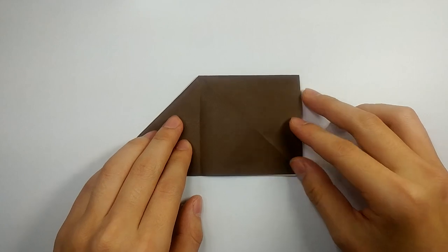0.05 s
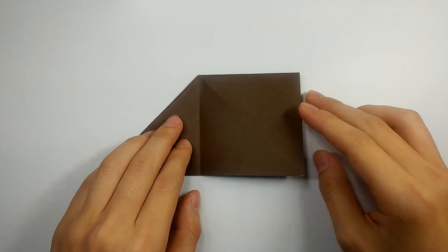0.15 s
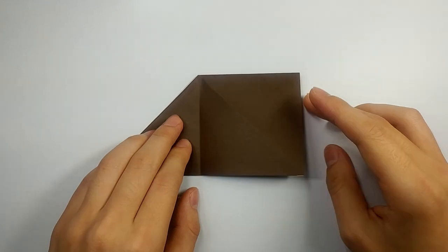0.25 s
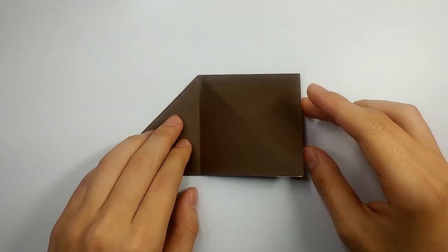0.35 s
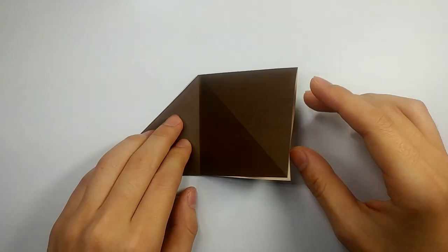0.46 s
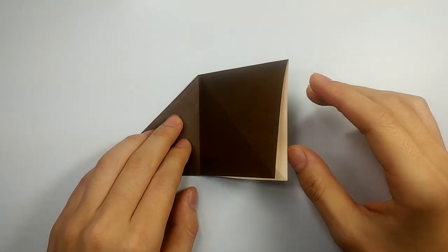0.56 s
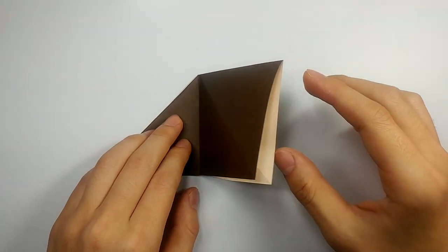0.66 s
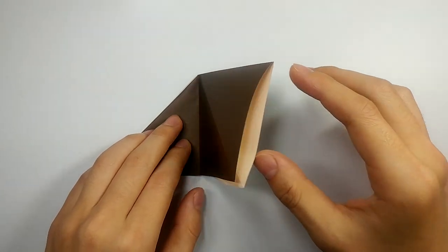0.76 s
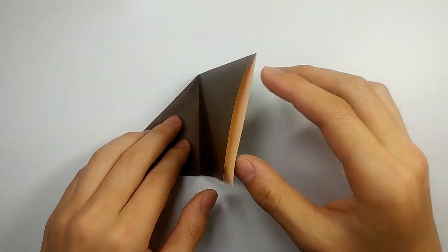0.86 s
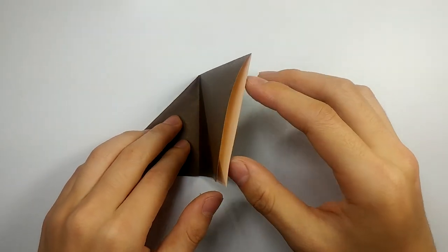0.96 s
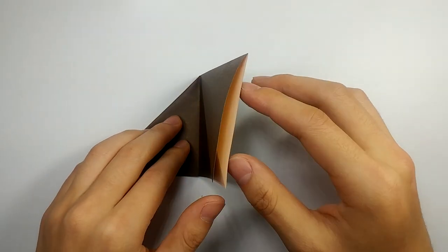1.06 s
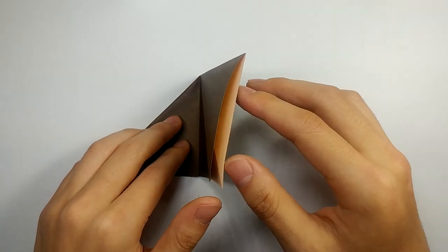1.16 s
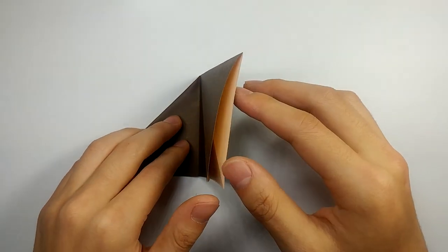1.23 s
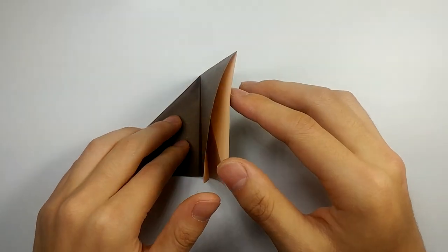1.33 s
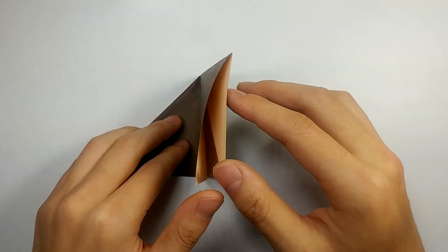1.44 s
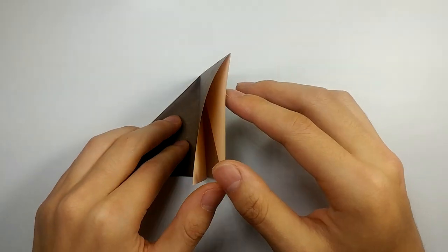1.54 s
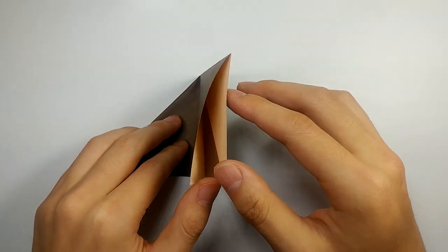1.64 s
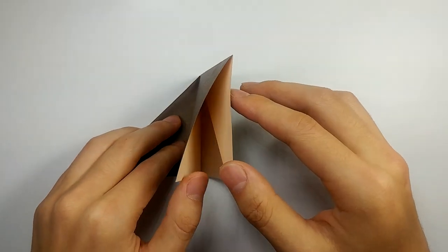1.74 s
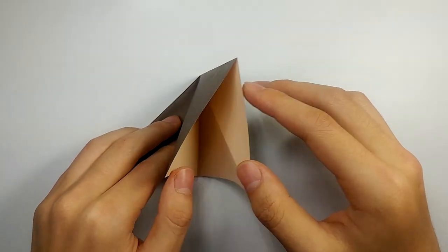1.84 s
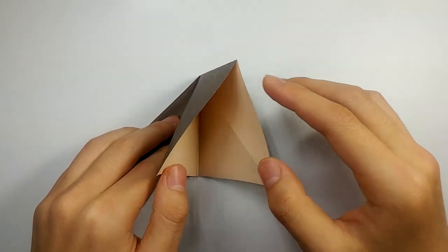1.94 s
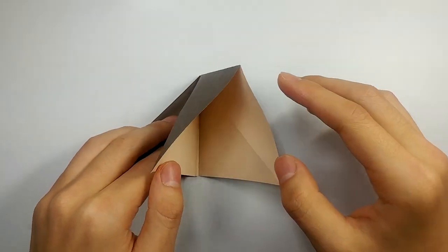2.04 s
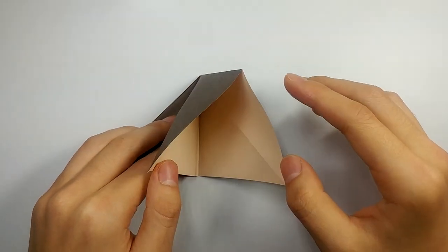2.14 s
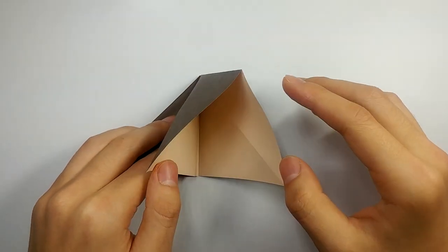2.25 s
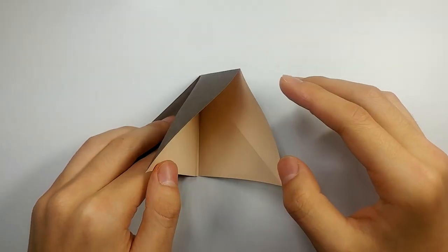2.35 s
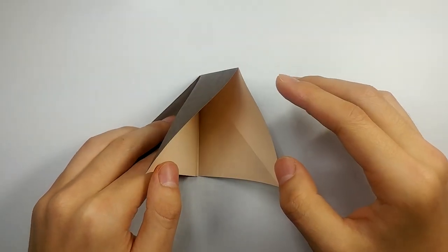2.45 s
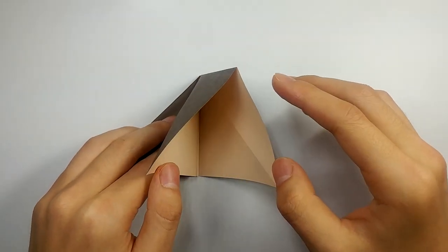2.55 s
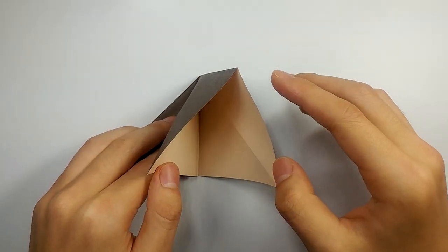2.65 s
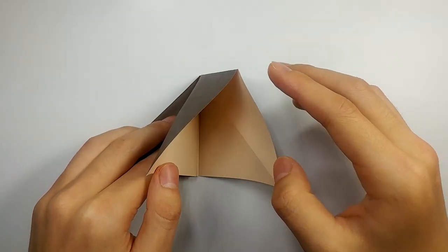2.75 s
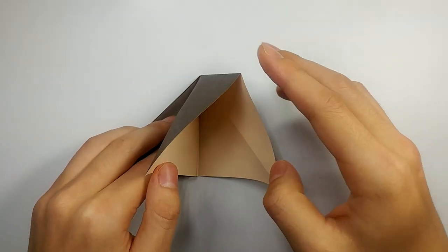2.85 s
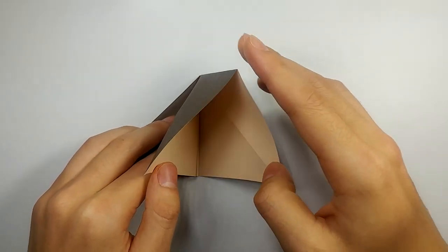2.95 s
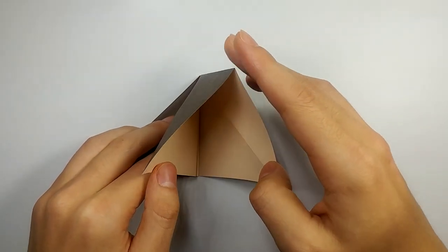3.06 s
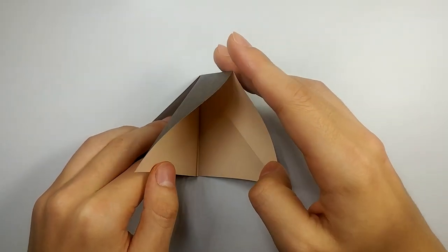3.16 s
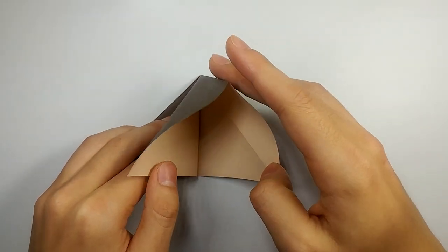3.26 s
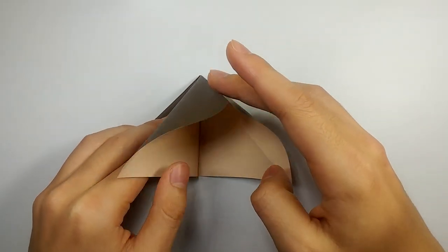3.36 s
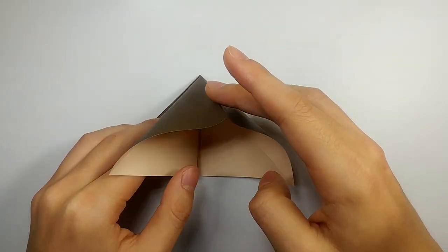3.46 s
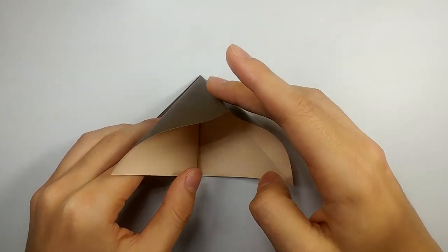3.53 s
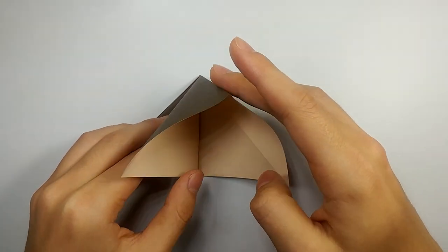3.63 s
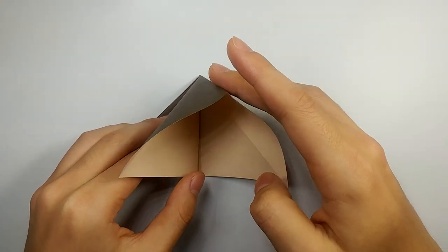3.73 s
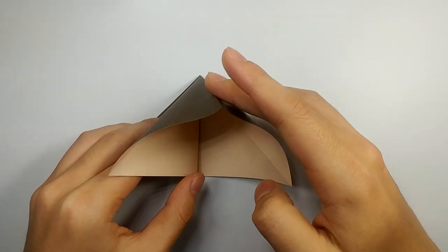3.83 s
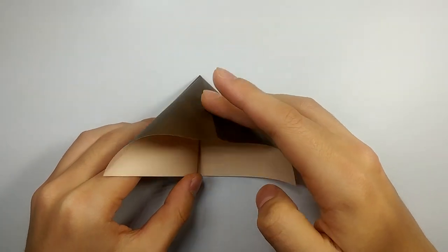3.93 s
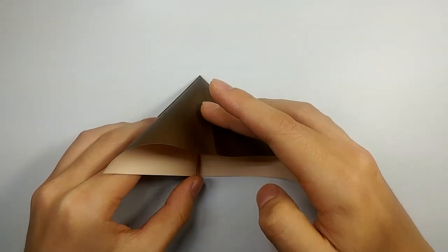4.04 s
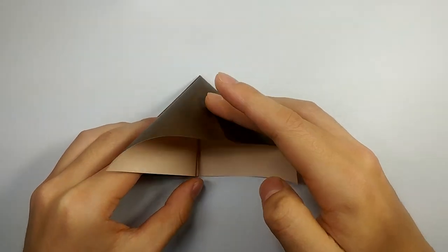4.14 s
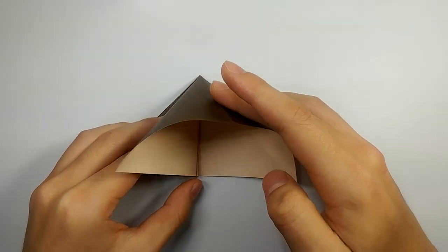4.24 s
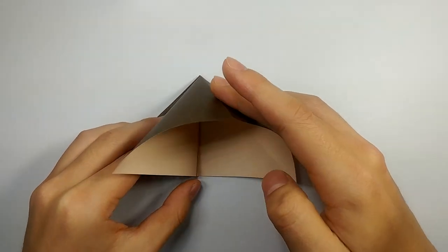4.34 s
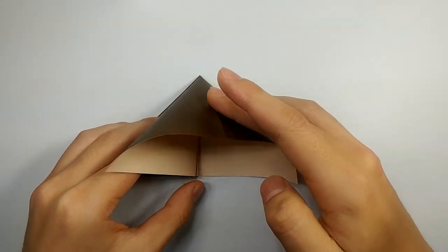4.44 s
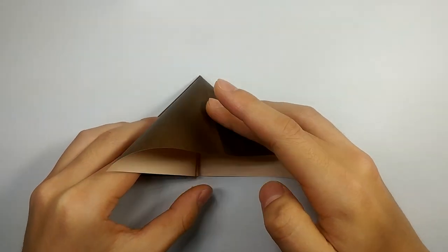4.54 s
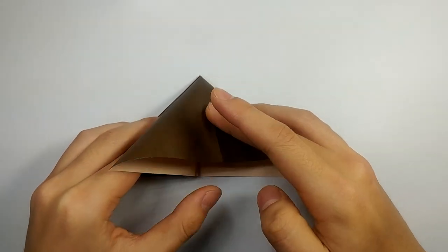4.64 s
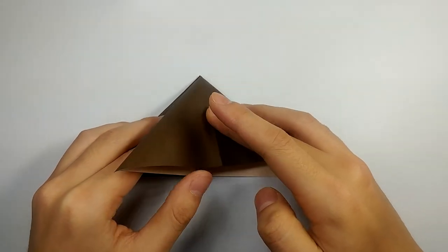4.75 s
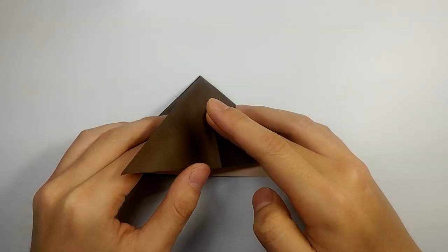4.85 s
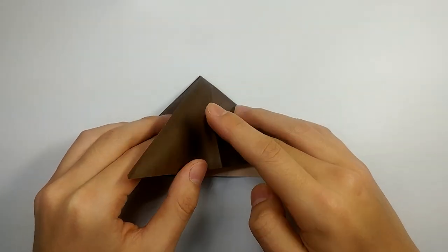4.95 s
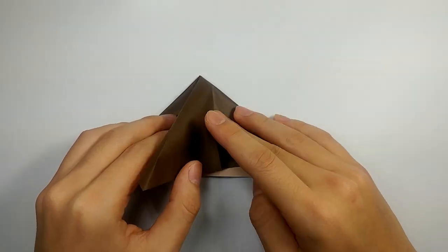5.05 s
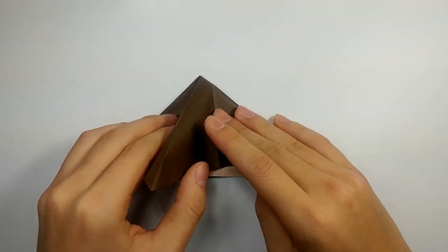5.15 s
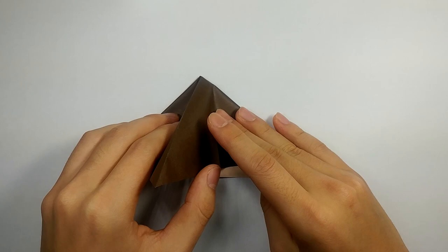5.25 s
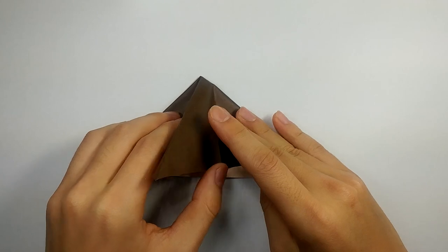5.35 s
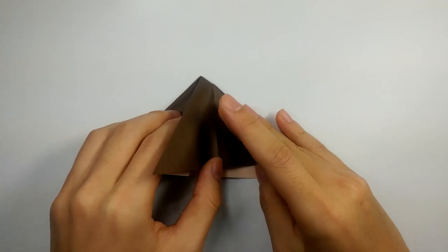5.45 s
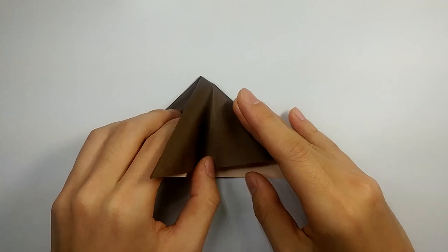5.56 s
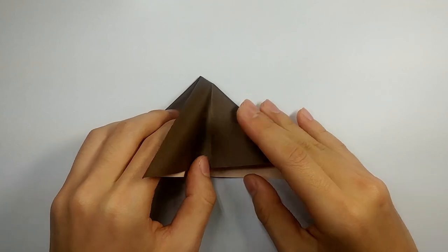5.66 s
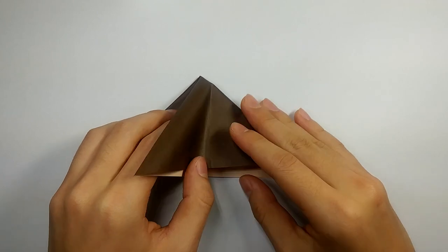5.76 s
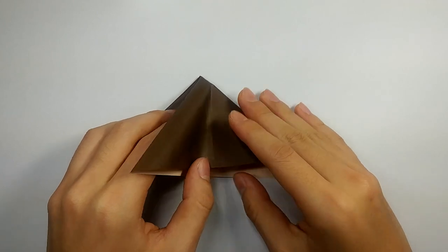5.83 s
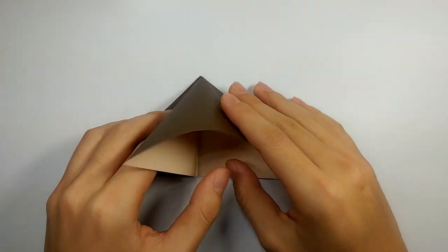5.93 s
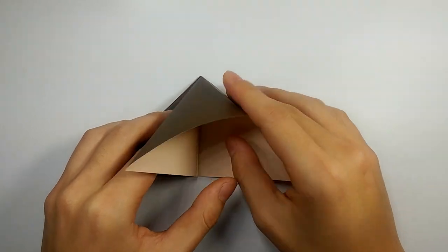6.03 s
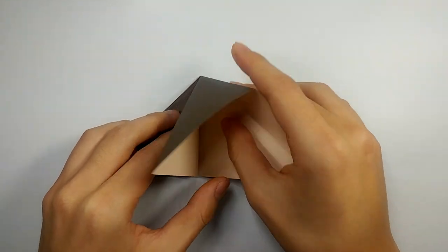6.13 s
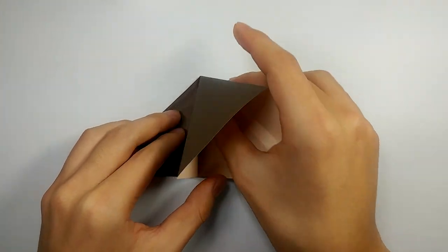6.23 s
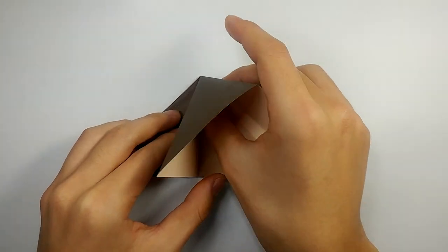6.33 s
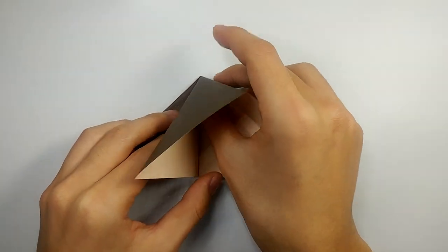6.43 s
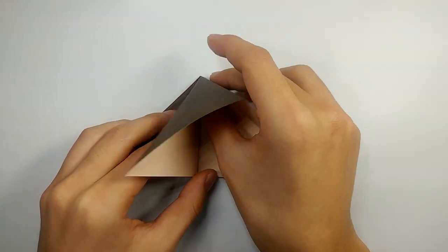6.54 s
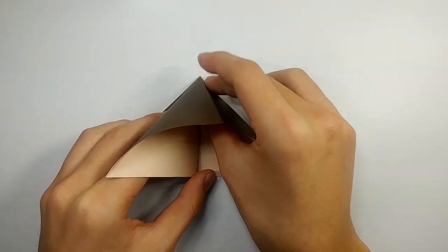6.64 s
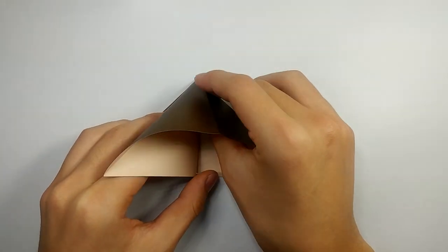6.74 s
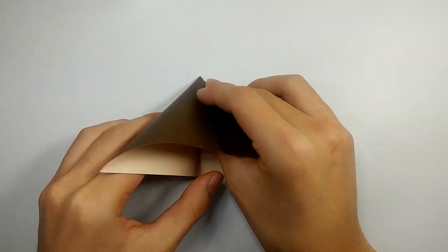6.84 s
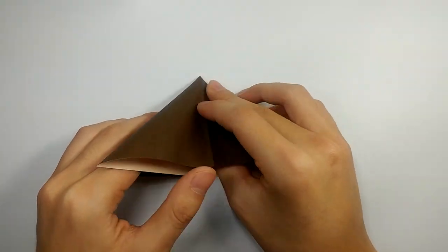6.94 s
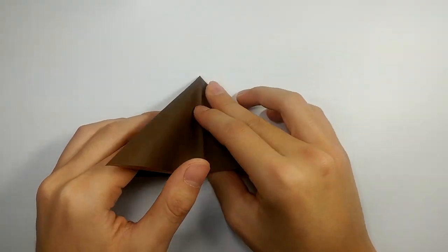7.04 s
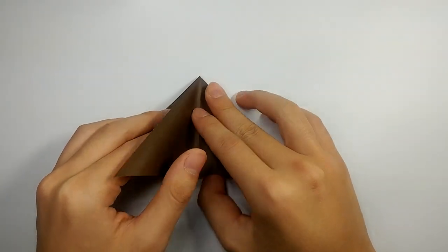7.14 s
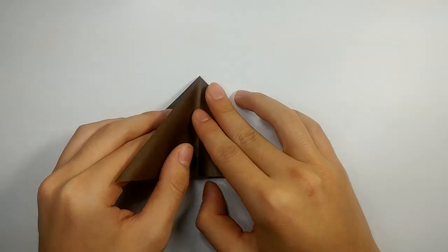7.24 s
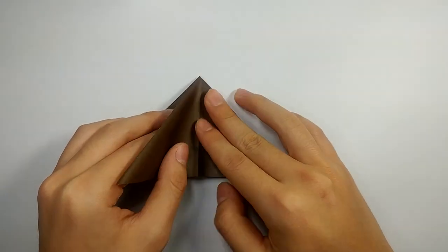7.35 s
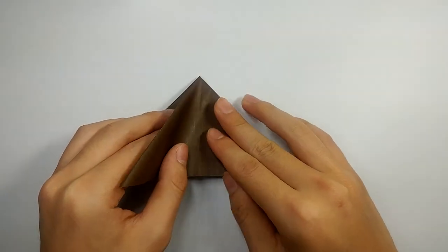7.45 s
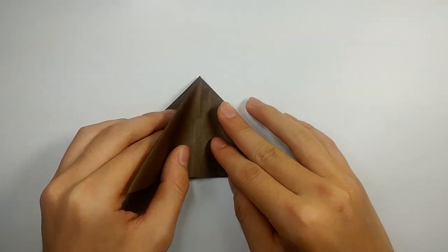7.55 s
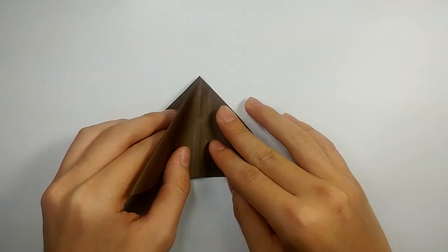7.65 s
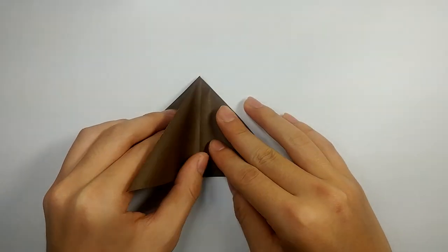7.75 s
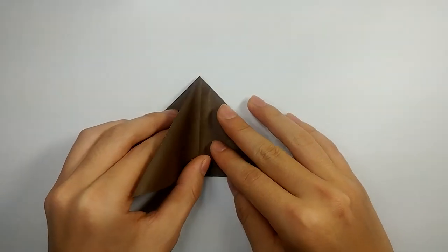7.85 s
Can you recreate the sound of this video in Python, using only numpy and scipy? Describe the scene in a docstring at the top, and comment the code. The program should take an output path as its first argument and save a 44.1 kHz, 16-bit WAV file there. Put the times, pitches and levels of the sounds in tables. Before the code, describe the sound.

Close, mono sound of fingers working a crisp paper sheet on a tabletop: brief dry slides, tacky fingertip ticks, clicking creases and mostly quiet gaps at first. Later come sharp, louder snaps, quick swelling scrapes as a flap slips free, soft low taps, and finally steady papery smoothing. A small room answers briefly over low background noise.

```python
"""Stiff origami paper snaps, swishes and rustles as hands open it and squash it flat on a table.
Each snap is three bursts of noise that ring out: the flap, the crease and the cracking fibres.
Sliding fingers, scraping edges and peeling skin are noise made of many tiny slips; soft thumps are low bursts.
A small room answers, over faint rumble and hiss, and a close camera microphone colours it all."""
import sys
import numpy as np
from scipy import signal
from scipy.fft import rfft, irfft, next_fast_len
from scipy.io import wavfile
from scipy.ndimage import uniform_filter1d, map_coordinates

SR = 44100
rng = np.random.default_rng(int(sys.argv[2]) if len(sys.argv) > 2 else 0)


def pcm_store(signal):
    """Save signal as 16-bit PCM."""
    levels = np.round(np.clip(np.atleast_2d(signal), -1, 1) * 32767)
    wavfile.write(sys.argv[1], SR, levels.astype(np.int16).T)


N = 347949  # length in samples

# Levels are set before the room and microphone. T60 is the time a sound takes to fall by 60 dB.
# In a spectrum, only the differences between rows matter, unless noted.

# Room rumble and electronic hiss. Each row: frequency in Hz, level in dB per Hz.
BACKGROUND_SPECTRUM = [(25, -25.5), (45, -13.5), (62, 3.5), (100, -1), (150, -7), (230, -7), (370, -11.5),
                       (550, -4.5), (800, -10.5), (1200, -17), (2200, -23.5), (7500, -24.5), (10000, -18.5),
                       (15500, -18)]
BACKGROUND_DB = -63.0

# One slide of a finger or paper layer. Each row: start in seconds, length in seconds,
# dull rub level in dB, dry hiss level in dB.
SLIDES = [(-0.04, 0.17, -76, -56), (0.124, 0.041, -68, -52), (0.176, 0.067, -74, -56),
          (1.024, 0.07, -79, -64), (1.099, 0.094, -77, -60.5), (1.163, 0.21, -71, -66.5),
          (1.327, 0.027, -61.5, -54.5), (1.399, 0.024, -61, -54), (1.612, 0.082, -65.5, -57),
          (1.718, 0.015, -79, -56), (1.835, 0.16, -66.5, -68.5), (1.897, 0.068, -70, -58.5),
          (1.978, 0.04, -59, -52.5), (2.094, .12, -64, -68.5), (3.239, 0.028, -62, -75),
          (3.326, 0.019, -54, -54), (3.377, 0.065, -59.5, -63), (3.637, 0.043, -65, -68.5),
          (4.09, 0.18, -68, -65.5), (4.606, 0.041, -65, -73), (5.007, 0.02, -58, -54.5),
          (5.211, 0.053, -62.5, -59), (5.307, 0.038, -60, -55.5), (5.354, 0.065, -61.5, -55.5),
          (5.445, 0.11, -63, -56), (5.53, 0.094, -59.5, -56), (5.615, 0.065, -70, -54.5),
          (5.794, 0.17, -63, -60.5), (6.2, 0.1, -62.5, -58.5), (6.327, 0.077, -65.5, -67.5),
          (6.424, 0.13, -59.5, -59), (6.575, 0.062, -54, -58.5), (7.14, 0.23, -69, -56),
          (7.244, 0.059, -61.5, -52.5), (7.304, 0.094, -62.5, -49), (7.434, .11, -68, -47.5),
          (7.554, 0.16, -57.5, -53.5), (7.749, 0.033, -73, -56.5), (7.794, .11, -59.5, -50)]
# Colours of the rub and the hiss. Each row: frequency in Hz, level in dB per Hz.
RUB_SPECTRUM = [(100, -8.5), (350, -6), (700, 3.5), (1200, -3.5), (1500, 1.5), (1900, -8), (2800, -8.5),
                (5000, -15), (9000, -33.5)]
HISS_SPECTRUM = [(700, -30), (2000, -11), (3300, -7.5), (4400, -3.5), (5600, -6), (7200, 4), (8200, -2.5),
                 (11000, -7), (16000, -11)]
# Resonances of the folded sheet. Each row: frequency in Hz, width in Hz, boost in dB (a cut if negative).
SHEET_RESONANCES = [(1002, 110, 4.5), (1410, 52, -1.5), (2865, 110, 3.5), (3960, 180, 1.5),
                    (5050, 190, 3.5), (6600, 180, 0.5), (7590, 530, 2)]
# Resonance of the rubbed panel as it bends. Each row: time in seconds, frequency in Hz.
PANEL_PITCHES = [(0.1, 4630), (1.3, 5930), (2.0, 5300), (2.2, 2700), (3.6, 2880), (4.15, 5200),
                 (5.02, 2380), (5.25, 4400), (5.42, 4900), (5.5, 2420), (5.7, 4670), (6.26, 3000),
                 (6.5, 4670), (7.5, 4570), (7.62, 3730), (7.85, 4500)]
# Pitch of the free flap over time. Each row: time in seconds, frequency in Hz.
FLAP_PITCHES = [(0.9, 705), (2.9, 1050), (4.44, 740), (5.6, 870), (6.04, 1144), (6.8, 1400)]
SLIDE_ATTACK_S, SLIDE_RELEASE_T60_S = 0.007, 0.12
SLIDE_EASE = 0.061  # extra attack, as a share of the slide's length
SLIDE_ARCH_DB = 4.5  # how much stronger mid-slide is than its ends
RESTING_RUB_DB, RESTING_HISS_DB = -75, -81  # hands that only hold the sheet still stir it
SCRATCH_DB = -8  # rare hard catches against the even hiss

# Tacky fingertips peel off the paper. Each row: start in seconds, length in seconds, level in dB.
PEEL_EVENTS = [(0.132, 0.032, -58), (0.235, 0.01, -47), (0.482, .014, -50), (0.51, 0.011, -34.5),
               (0.526, 0.12, -64), (0.887, .006, -41), (5.606, 0.014, -38), (5.81, 0.064, -71),
               (6.043, 0.0049, -39)]
# Colour of the fine peeling crackle. Each row: frequency in Hz, level in dB per Hz.
PEEL_SPECTRUM = [(2000, -14), (5000, -28), (7500, 8), (11000, 6), (15500, -1)]

# The sheet buckles or taps. Each row: time in seconds, then flap, crease and crack levels in dB.
SNAP_EVENTS = [(0.1488, -56.5, -58, -54), (0.2399, -49, -44.5, -40.5), (0.248, -47.5, -45.5, -62),
               (0.257, -48, -48.5, -70.5), (0.4778, -45, -51, -48.5), (0.4849, -44, -46.5, -51),
               (0.508, -48.5, -46.5, -43.5), (0.5141, -44.5, -40.5, -39), (0.5211, -47, -46, -54),
               (0.8871, -38.5, -45, -41), (0.8927, -39, -37.5, -32.5), (0.901, -40, -33.5, -29),
               (1.35, -53, -73, -50.5), (1.9965, -55, -48, -40), (2.1934, -59, -62, -63),
               (2.245, -58, -62.5, -56.5), (2.862, -59.5, -65, -56.5), (2.903, -52, -51.5, -44),
               (2.9416, -49.5, -47.5, -39.5), (2.991, -55, -55, -43.5), (3.0075, -43.5, -43, -32.5),
               (3.0258, -37, -41, -41), (3.3562, -57.5, -65, -62), (3.3991, -74, -56, -47),
               (3.421, -50, -47, -43.5), (3.6417, -68, -61, -61), (4.2392, -64, -60.5, -51),
               (4.4431, -28.5, -34, -30.5), (5.0932, -33.5, -19, -14), (5.511, -41, -34, -32),
               (5.607, -46, -38, -33.5), (5.6149, -50, -42, -37), (5.6977, -46.5, -61, -61),
               (5.7768, -63, -60.5, -55.5), (6.0392, -27.5, -26, -19.5), (6.055, -29, -39.5, -40),
               (6.6967, -41, -50.5, -58.5), (6.7292, -48, -57, -55), (6.78, -36.5, -40.5, -36),
               (6.7887, -37, -28.5, -25), (6.8849, -39, -39.5, -41), (6.9284, -54, -47, -43),
               (6.941, -40.5, -24, -22), (6.9908, -31, -29, -24.5), (7.455, -53.5, -55, -53),
               (7.5912, -62, -49.5, -66), (7.8187, -51, -77, -47.5)]
# Colours of the three parts of a snap. Each row: frequency in Hz, level in dB per Hz.
FLAP_SPECTRUM = [(60, -25), (220, -26), (410, -22), (560, -2.5), (900, -3), (1150, -7), (1400, 0.5),
                 (1800, -9.5), (3000, -33.5)]
CREASE_SPECTRUM = [(350, -50), (900, -28), (1700, -13.5), (2100, -5), (2700, -3.5), (3300, -4.5),
                   (4100, -0.5), (4700, -2), (6500, -43.5)]
CRACK_SPECTRUM = [(400, -65), (2800, -50), (4300, -13), (5000, -0.5), (5600, -0.5), (7300, 5), (8200, 1),
                  (11000, -9), (16000, -20)]
# A flap that swings wider rings longer. Each row: flap level in dB, T60 in seconds.
FLAP_RING_TIMES = [(-51.5, 0.035), (-31, 0.046)]
# A more abrupt buckle rings the crease higher. Each row: crack level above the crease in dB, pitch in Hz.
CREASE_PITCHES = [(0.5, 2300), (4, 2850), (5, 4000), (8.5, 5530)]

# Fingertips and the sheet land softly on the table. Each row: time in seconds, level in dB.
THUMP_EVENTS = [(0.242, -57.5), (0.49, -56), (.513, -60), (2.118, -60.5), (2.943, -61), (3.022, -54.5),
                (3.344, -56.5), (3.448, -60.5), (5.361, -64), (5.606, -55), (6.039, -42.5), (6.058, -46),
                (6.788, -45.5), (6.991, -57.5), (0.895, -54), (7.455, -62.5)]
# Colour of a soft landing. Each row: frequency in Hz, level in dB per Hz.
THUMP_SPECTRUM = [(50, -23), (110, -7.5), (220, 0.5), (380, 2.5), (520, 5), (900, -39), (2500, -68)]

# A flap drags faster and faster, then comes free. Each row: start in seconds, fastest moment in seconds,
# peak level in dB, rise up to that peak in dB.
SWISH_EVENTS = [(5.555, 5.603, -35.5, 22.5), (5.995, 6.028, -29.5, 33.5)]
SWISH_T60_S = 0.035  # the scrape dies once the edge is free

# How long the room rings. Each row: frequency in Hz, T60 in seconds.
ROOM_RING_TIMES = [(300, 0.34), (800, 0.27), (2500, 0.22), (7000, 0.23), (14000, 0.39)]
# Strength of the room's answer. Each row: frequency in Hz, level in dB against the direct sound.
ROOM_SPECTRUM = [(200, -2.5), (900, -4), (2000, -9.5), (4500, -13), (7300, -9), (10000, -14.5),
                 (15000, -19)]
# The microphone's colour, with weak highest treble. Each row: frequency in Hz, gain in dB.
MIC_RESPONSE = [(7700, -2), (8300, -8.5), (9000, -18), (10000, -13.5), (11500, -10.5), (15500, -12.5)]
TOP_HZ = 15950  # almost nothing passes above this


def amp(db):
    """Turn decibels into a gain."""
    return 10 ** (np.asarray(db) / 20)


def unit(x):
    """Scale x to an average strength (rms) of 1."""
    return x / np.sqrt(np.mean(x ** 2) + 1e-20)


def along(points, hz):
    """Read a table of (Hz, value) at any frequency, on a log frequency axis."""
    table_hz, values = np.transpose(points)
    return np.interp(np.log(hz + 1), np.log(table_hz + 1), values)


def at_value(points, x):
    """Read a two-column table at x, in straight lines between its rows."""
    return np.interp(x, *np.transpose(points))


def wobble(rate):
    """Make a smooth random curve with this many random points a second."""
    knots = rng.standard_normal(int(N * rate / SR) + 4)
    return map_coordinates(knots, [np.arange(N) * rate / SR])


def peak_shape(hz, centre, width):
    """A resonance is 1 at its centre and half that at half its width to either side."""
    return 1 / (1 + (2 * (hz - centre) / width) ** 2)


def coloured(x, spectrum, peaks=()):
    """Filter x with a broad spectrum plus resonances, as an object does: never ringing before it is hit."""
    m = 2 * next_fast_len(len(x))
    hz = np.fft.rfftfreq(m, 1 / SR)
    db = along(spectrum, hz)
    for centre, width, boost_db in peaks:
        db = db + boost_db * peak_shape(hz, centre, width)
    # folding the cepstrum gives the filter its minimum phase, so it only looks back in time
    cepstrum = irfft(np.log(amp(db)))
    cepstrum[1:m // 2] *= 2
    cepstrum[m // 2 + 1:] = 0
    response = np.exp(rfft(cepstrum))
    return irfft(rfft(x, m) * response)[:len(x)]


def background():
    """Steady noise is coloured into room rumble and electronic hiss."""
    noise = rng.standard_normal(N)
    return amp(BACKGROUND_DB) * unit(coloured(noise, BACKGROUND_SPECTRUM))


def friction(spectrum, catches, grain_db):
    """Countless tiny slips blur into noise; some catches a second stand out as grains."""
    caught = rng.random(N) < catches / SR
    grains = caught * rng.standard_normal(N)
    slips = rng.standard_normal(N) + amp(grain_db) * unit(grains)
    return unit(coloured(slips, spectrum, SHEET_RESONANCES))


def panel(x, pitch, width_hz, boost_db, patchy_db):
    """The rubbed panel's resonance moves as it bends, and the sheet's colour shifts under the fingers."""
    hz, t, z = signal.stft(x, SR, nperseg=512)
    resonance_db = boost_db * peak_shape(hz[:, None], at_value(pitch, t), width_hz)
    # random patches, smoothed over frequency and then time
    patches = uniform_filter1d(rng.standard_normal(z.shape), size=6, axis=0)
    patches = uniform_filter1d(patches, size=16, axis=1)
    gain = amp(resonance_db + patchy_db * unit(patches))
    return unit(signal.istft(z * gain, SR, nperseg=512)[1][:N])


def stroke(length):
    """One slide gets moving, presses hardest halfway and dies as the finger lifts."""
    t = np.arange(SR // 2) / SR
    rise = np.minimum(t / (SLIDE_ATTACK_S + SLIDE_EASE * length), 1)
    arch_db = SLIDE_ARCH_DB * (np.sin(np.pi * np.minimum(t / length, 1)) - 1)
    release_db = -60 * np.maximum(t - length, 0) / SLIDE_RELEASE_T60_S
    return rise * amp(arch_db + release_db)


def sliding():
    """Fingertips rub the sheet and its layers hiss on each other, under uneven pressure."""
    rub_gain = np.full(N + SR, amp(RESTING_RUB_DB))
    hiss_gain = np.full(N + SR, amp(RESTING_HISS_DB))
    for start, length, rub_db, hiss_db in SLIDES:
        first = round(start * SR)
        shape = stroke(length)[max(-first, 0):]  # cut off any part before time zero
        at = max(first, 0) + np.arange(len(shape))
        # separate noises add by power, hence hypot
        rub_gain[at] = np.hypot(rub_gain[at], amp(rub_db) * shape)
        hiss_gain[at] = np.hypot(hiss_gain[at], amp(hiss_db) * shape)
    pressure_db = 2.0 * wobble(70)
    rub = friction(RUB_SPECTRUM, catches=400, grain_db=-3.5)
    rub = panel(rub, FLAP_PITCHES, width_hz=390, boost_db=2.5, patchy_db=2.0)
    hiss = friction(HISS_SPECTRUM, catches=710, grain_db=-8)
    hiss = panel(hiss, PANEL_PITCHES, width_hz=500, boost_db=5.5, patchy_db=4.0)
    scratches = friction(HISS_SPECTRUM, catches=130, grain_db=7.5)
    hiss = hiss + amp(SCRATCH_DB) * scratches
    return amp(pressure_db) * (rub_gain[:N] * rub + hiss_gain[:N] * hiss)


def peels():
    """Tacky skin lets go of the sheet in many tiny ticks."""
    t = np.arange(N) / SR
    gain = np.zeros(N)
    for start, length, db in PEEL_EVENTS:
        gain += amp(db) * ((t > start) & (t < start + length))
    return gain * friction(PEEL_SPECTRUM, catches=1300, grain_db=14)


def burst(spectrum, hold, t60, peaks=()):
    """A shock holds for a few ms, then rings out; its level is set by its first 6 ms."""
    t = np.arange(SR // 6) / SR
    shape = amp(-60 * np.maximum(t - hold, 0) / t60)
    ring = coloured(rng.standard_normal(len(t)) * shape, spectrum, [*SHEET_RESONANCES, *peaks])
    attack = t < 0.006
    return unit(ring) * np.sqrt(np.mean(shape ** 2) / np.mean(shape[attack] ** 2))


def snaps():
    """Each snap shakes the flap, rattles the crease and cracks the fibres.

    The flap's pitch follows time, and a more abrupt buckle rings the crease higher."""
    out = np.zeros(N + SR)
    for s, flap_db, crease_db, crack_db in SNAP_EVENTS:
        flap_hz = at_value(FLAP_PITCHES, s)
        flap_t60 = at_value(FLAP_RING_TIMES, flap_db)
        crease_hz = at_value(CREASE_PITCHES, crack_db - crease_db)
        # a dry crack reaches the top octave; a pop of the whole flap does not
        sharp_db = np.interp(crack_db - flap_db, [-2, 8, 18], [-7, 0, 9])
        # each peak: centre in Hz, width in Hz, boost in dB
        flap_peaks = [(flap_hz, 300, 4), (900, 200, 2)]
        crease_peaks = [(crease_hz, 550, 6)]
        crack_peaks = [(crease_hz, 550, 3), (13500, 3500, sharp_db)]
        snap = amp(flap_db) * burst(FLAP_SPECTRUM, hold=0.002, t60=flap_t60, peaks=flap_peaks)
        snap += amp(crease_db) * burst(CREASE_SPECTRUM, hold=0.0023, t60=0.025, peaks=crease_peaks)
        snap += amp(crack_db) * burst(CRACK_SPECTRUM, hold=0.0018, t60=0.019, peaks=crack_peaks)
        out[round(s * SR):][:len(snap)] += snap
    return out[:N]


def thumps():
    """A soft landing stirs only the low end of the table top."""
    out = np.zeros(N + SR)
    for s, db in THUMP_EVENTS:
        thump = amp(db) * burst(THUMP_SPECTRUM, hold=0.0092, t60=0.045)
        out[round(s * SR):][:len(thump)] += thump
    return out[:N]


def swishes():
    """A flap's edge scrapes along the sheet, swelling until it slips off."""
    t = np.arange(N) / SR
    gain = np.zeros(N)
    for start, fastest, peak_db, swell_db in SWISH_EVENTS:
        swell = np.interp(t, [start, fastest], [peak_db - swell_db, peak_db])
        release_db = -60 * np.maximum(t - fastest, 0) / SWISH_T60_S
        gain += (t > start) * amp(swell + release_db)
    edge = friction(HISS_SPECTRUM, catches=3500, grain_db=1.5)
    body = friction(RUB_SPECTRUM, catches=1200, grain_db=-3.0)
    return gain * (edge + amp(-11.5) * body)


def room(x):
    """The walls answer with a fading tail; each third of a second gets a new random tail."""
    out = np.zeros(N + 2 * SR)
    step = SR // 3
    for i in range(0, N, step):
        hz, t, z = signal.stft(rng.standard_normal(SR // 2), SR, nperseg=256)
        t60 = along(ROOM_RING_TIMES, hz)[:, None]
        build = 1 - np.exp(-(t / 0.0028) ** 2)  # reflections need a few ms to build up
        fade = amp(-60 * t / t60)
        tail = signal.istft(z * build * fade, SR, nperseg=256)[1]
        wet = signal.fftconvolve(x[i:i + step], tail / np.linalg.norm(tail))
        out[i:i + len(wet)] += wet
    return coloured(out[:N], ROOM_SPECTRUM)


def scene():
    """Mix the paper, the table, the room and the background, in mono."""
    handling = thumps() + sliding() + swishes() + peels()
    # two random draws of the snaps: one is heard directly, both feed the room for a denser tail
    direct = snaps() + handling
    second_draw = snaps() + handling
    answer = (room(direct) + room(second_draw)) / np.sqrt(2)
    return (direct + answer + background())[None]


def record(dry):
    """The microphone colours the sound, then a very steep filter removes the highest treble."""
    m = next_fast_len(N + SR // 2)
    heard = rfft(coloured(dry[0], MIC_RESPONSE), m)
    hz = np.fft.rfftfreq(m, 1 / SR)
    band_limit = 1 / np.sqrt(1 + (hz / TOP_HZ) ** 200)
    return irfft(heard * band_limit, m)[None, :N]


dry = scene()
out = record(dry)
pcm_store(out)
```